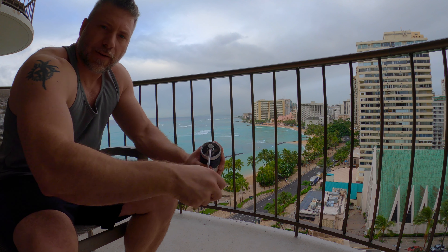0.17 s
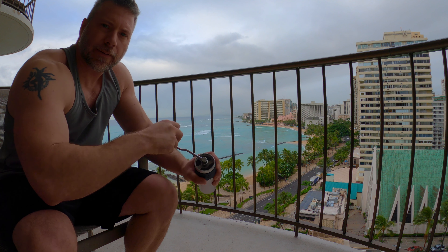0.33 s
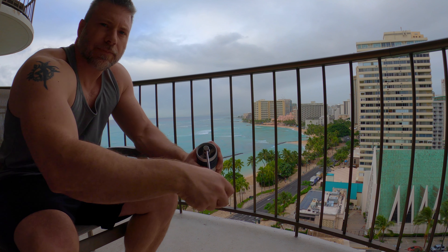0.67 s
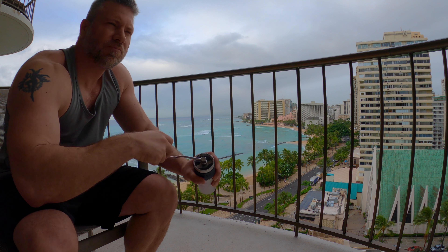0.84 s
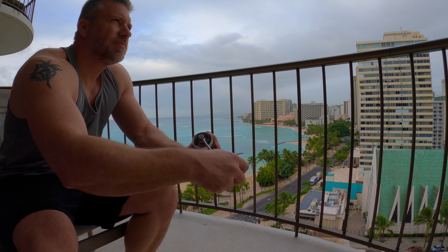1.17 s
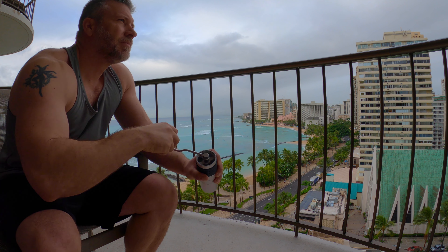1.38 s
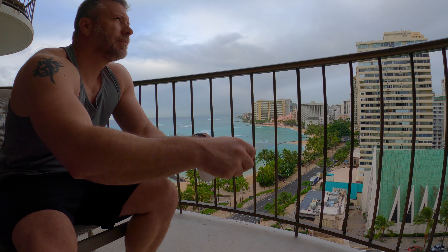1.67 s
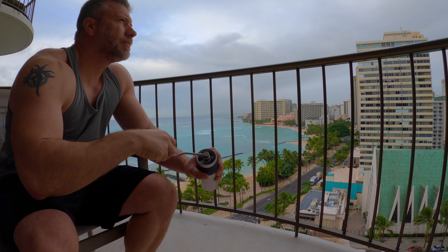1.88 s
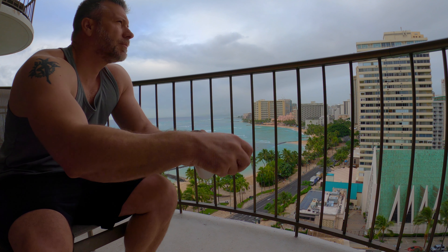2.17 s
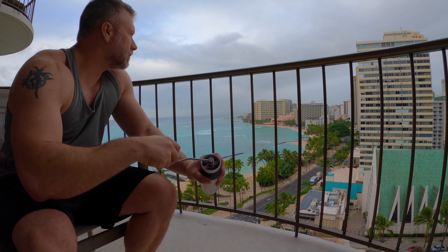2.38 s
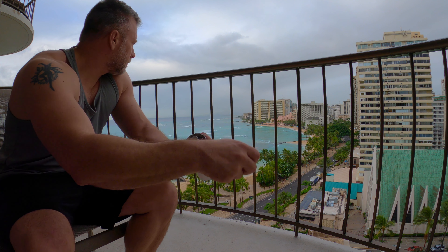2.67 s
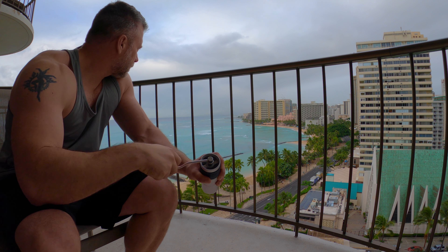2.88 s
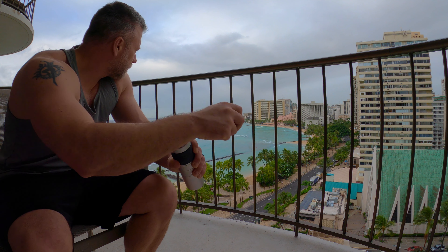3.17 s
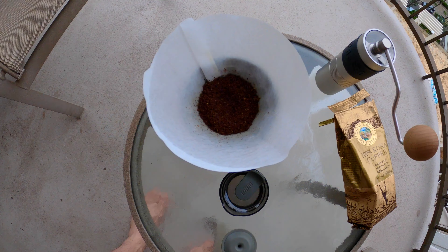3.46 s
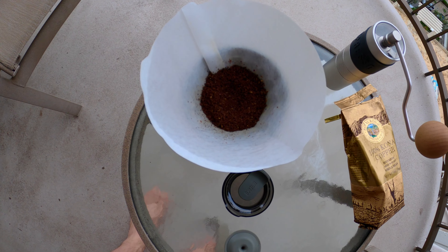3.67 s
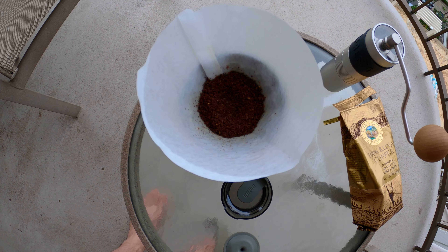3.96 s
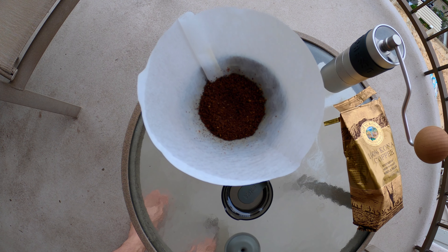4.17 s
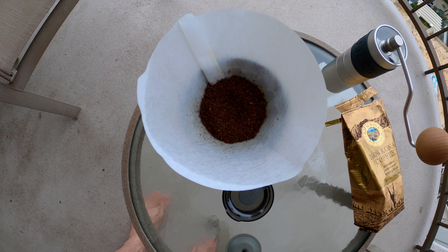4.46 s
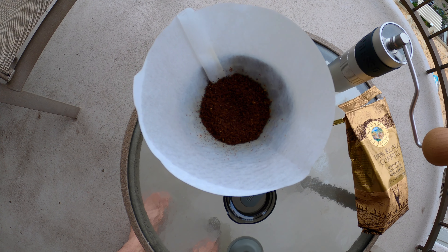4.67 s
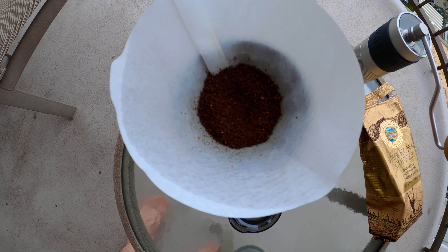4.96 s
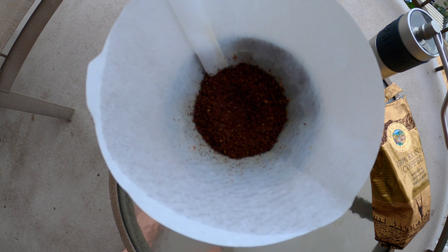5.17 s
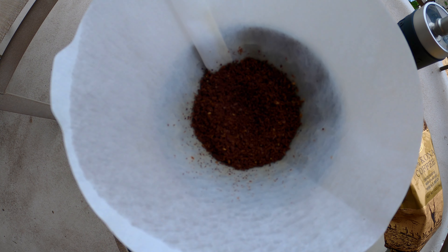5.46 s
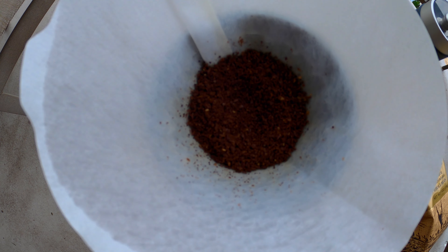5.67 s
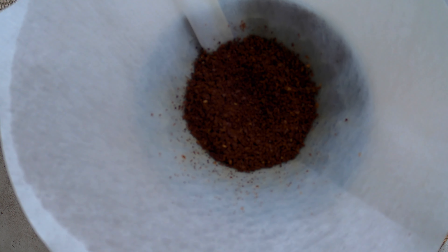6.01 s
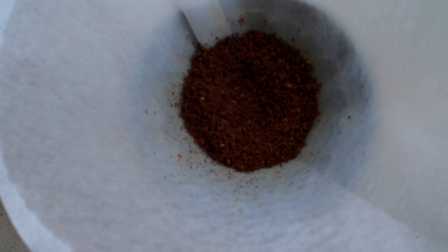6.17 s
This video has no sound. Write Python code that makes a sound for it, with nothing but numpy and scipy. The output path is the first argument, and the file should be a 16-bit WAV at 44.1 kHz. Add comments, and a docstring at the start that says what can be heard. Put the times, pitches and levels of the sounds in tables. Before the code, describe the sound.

On a high balcony, a hand grinder is cranked about twice a second. Coffee beans crunch and snap between its burrs, making the metal shell ring, over steady traffic, wind and humming ventilation fans. A little past halfway the sound drops out briefly and returns without the grinder. Gusts thump the microphone, a heavy vehicle drones away in the street below, and one fan whines faintly.

```python
"""A hand coffee grinder is cranked about twice a second on a high balcony. Beans crack and crumble
between its burrs (the toothed grinding parts), and the cracks make its metal shell ring.
Traffic, wind and the hum of ventilation fans lie behind it. The sound fades out and back in to a
second scene: the grinder rests, gusts buffet the microphone, a heavy vehicle drones away in the
street below and one fan whines."""
import sys
import numpy as np
from scipy import signal
from scipy.fft import rfft, irfft, next_fast_len
from scipy.io import wavfile
from scipy.ndimage import uniform_filter1d

SR = 44100
rng = np.random.default_rng(int(sys.argv[2]) if len(sys.argv) > 2 else 0)


def dump_mix(stems):
    """Bounce the given channels to the path in sys.argv[1] as a 16-bit WAV at rate SR."""
    frames = np.atleast_2d(stems).T  # one column per channel
    limited = np.clip(frames, -1, 1)  # hard clip at full scale
    pcm = np.round(limited * 32767).astype(np.int16)
    wavfile.write(sys.argv[1], SR, pcm)


N = 279594

TIME = np.arange(N) / SR
# tone colour (how strong each frequency is) of fine crumbs breaking: f/Hz, level/dB
CRUMB_COLOUR = [(800, -8), (3000, -4.5), (5000, 2), (7000, 0), (9000, -6), (10800, -9.5), (13000, -12.5),
                (15700, -19.5)]
# tone colour of a bean splitting: f/Hz, level/dB
SPLIT_COLOUR = [(300, -22), (900, -4), (1600, 3), (2700, 5.5), (3750, 4.5), (4900, 3.5), (6200, -6),
                (8500, -19), (15000, -39.5)]


def grinder():
    """The sounds of the grinder, and a faint sniff-like hiss, with a slightly different tone on the left and
    right."""
    # how much louder the left side is than the right: f/Hz, level/dB
    left_over_right = [(500, -0.5), (1200, 3), (3000, 2.5), (5000, 0), (8000, -2), (12000, -4)]
    sound = bean_crunch() * empty_burrs() + bean_snaps() + handle_knock() + rasps()
    return filtered(sound, lambda f: undb(spectrum_db(left_over_right, f) * np.array([[.5], [-.5]])))


def bean_crunch(uneven_db=2.0, jolt_db=3.0):
    """The burrs bite: wedged beans splinter, chunks and crumbs break, the body knocks in the hand."""
    # hard pushes on the crank: t/s, coarse crunch/dB, fine crackle/dB, half length/s
    pushes = [(0.003, -46, -49, 0.022), (0.127, -40.5, -55, 0.035), (0.48, -43.5, -48.5, 0.084),
              (0.645, -42.5, -54, 0.031), (0.818, -45.5, -56, 0.042), (0.975, -40.5, -48.5, 0.04),
              (1.165, -47, -53, 0.046), (1.534, -44, -52.5, 0.15), (1.8, -44.5, -51.5, 0.05),
              (2.09, -44, -48.5, 0.11), (2.56, -44.5, -50, 0.046), (3.054, -40.5, -46, 0.099),
              (3.472, -45, -47.5, 0.056)]
    # wedged beans giving way: t/s, low crunch/dB, splinters/dB, half length/s
    wedged_beans = [(0.135, -35.5, -43, 0.02), (0.348, -39, -41, 0.017), (0.45, -36, -50, 0.019),
                    (0.512, -44, -51, .025), (0.588, -35, -42, 0.014), (0.635, -38, -38, 0.024),
                    (0.98, -45, -46, .02), (1.40, -39, -43, .025), (1.472, -50, -45, 0.018),
                    (1.595, -38, -43, .02), (1.655, -41, -46, 0.014), (1.94, -40, -49, 0.023),
                    (2.01, -46, -47, 0.028), (2.107, -39.5, -41, 0.037), (2.445, -40, -42, 0.03),
                    (2.636, -47, -53, 0.022), (2.913, -39, -48, 0.044), (3.145, -36.5, -55, 0.016),
                    (3.212, -38, -47, 0.016), (3.285, -46, -50, 0.014), (3.445, -37.5, -46, 0.027)]
    # tone colours of wedged beans, breaking chunks and the grinder's body: f/Hz, level/dB
    wedged_colour = [(300, -23.5), (800, -5), (1300, -2.5), (1650, -0.5), (2100, -6.5), (3000, -16.5),
                     (10000, -60)]
    chunk_colour = [(300, -26), (900, -15.5), (1600, -9.5), (2400, 0.5), (4200, -3.5), (5200, -12),
                    (7000, -20), (15000, -46)]
    body_colour = [(60, -26.5), (170, -2.5), (260, -3.5), (345, 2), (420, -10.5), (800, -18), (2000, -31),
                   (10000, -65)]
    coarse_db = swells([(s, db, half_s) for s, db, _, half_s in pushes], rest_db=-48)
    fine_db = swells([(s, db, half_s) for s, _, db, half_s in pushes], rest_db=-56)
    # the resting level here is beans that only rub
    crush_db = swells([(s, db, half_s) for s, db, _, half_s in wedged_beans], rest_db=-48.5)
    splinter_db = swells([(s, db, half_s) for s, _, db, half_s in wedged_beans], rest_db=-np.inf)
    bite = unit(undb(uneven_db * np.tanh(walk(27.97)) + jolt_db * np.tanh(walk(110))))
    wedged = balcony(bite * fractures(900, spread_db=1.5), echo_db=-13.5)
    splinters = balcony(bite * fractures(700, spread_db=5.0), echo_db=-2.5)
    chunks = balcony(bite * fractures(800, spread_db=1.0), echo_db=-3.0)
    crumbs = balcony(bite * fractures(380, spread_db=3.8), echo_db=2.0)
    knocks = bite * fractures(700, spread_db=1.1)
    return (unit(metal_shell(colour(wedged, wedged_colour))) * undb(crush_db - 0.5)
            + unit(metal_shell(colour(splinters, SPLIT_COLOUR))) * undb(splinter_db - 2.0)
            + unit(metal_shell(colour(chunks, chunk_colour))) * undb(coarse_db)
            + unit(metal_shell(colour(crumbs, CRUMB_COLOUR))) * undb(fine_db)
            + unit(colour(knocks, body_colour)) * undb(0.33 * coarse_db - 21.5))


def fractures(per_second, spread_db):
    """Tiny breaks click at random moments, many small and a few large."""
    hits = rng.random(N) < per_second / SR
    sizes = undb(spread_db * np.minimum(rng.exponential(size=N), 3))
    return unit(hits * sizes * rng.choice([-1, 1], N))


def empty_burrs():
    """The volume of the crunch, which drops when the burrs run empty for a moment."""
    # lulls in the crunch: t/s, level change/dB, half length/s
    lulls = [(0.235, -4, 0.04), (0.735, -17, .022), (0.92, -4, 0.013), (1.223, -3, 0.017), (2.32, -4, .04),
             (2.8, -2, 0.04)]
    return undb(sum(db * bell_in_time(s, half_s) for s, db, half_s in lulls))


def bean_snaps(crumble_s=0.022, spurt_db=6.0, ping_decay_cycles=5.0):
    """A whole bean splits in a burst of tiny cracks and pings the burr; its pieces crumble in spurts."""
    # snapping beans: t/s, strength/dB, thud boost/dB, time to split/s, ping/Hz, ping/dB, crumbling/dB
    snapping_beans = [(0.087, -39.5, 11, .001, 3970, -27, -19), (0.132, -33.5, 9, .0018, 3430, -29, -13),
                      (0.1613, -29, -10, .0009, 9700, -40, -17), (0.167, -25, -12, .0008, 8000, -44, -16),
                      (0.3122, -34, 0, .001, 9500, -39, -13), (0.326, -31, 6.5, .0016, 3920, -41, -4),
                      (0.402, -31, 4, .0008, 4470, -36, -16), (0.575, -22.5, 4.5, .0009, 3920, -21, -13.5),
                      (0.606, -37, 6, .0008, 2840, -31, -17.5), (0.6205, -31, 8, .0016, 2300, -32.5, -14),
                      (0.6243, -25, 9.5, .0013, 3740, -17.5, -12), (0.646, -39, 10, .001, 3900, -32, -16),
                      (0.662, -37.5, 10, .0014, 4300, -33, -20.5), (0.7755, -23, -2, .0025, 6100, -42, -13),
                      (0.8884, -30, 2, .001, 4100, -38, -16), (0.99, -24.5, -5, .001, 4100, -41, -20),
                      (1.093, -29, -1, .0009, 3080, -33, -16), (1.1149, -33, -1, .0007, 4040, -36, -18),
                      (1.1606, -30, 6.5, .0013, 3180, -40, -18), (1.358, -38, 4, .001, 8200, -31, -16.5),
                      (1.4501, -40, 8, .0008, 3010, -28, -19), (1.466, -38, 10.5, .0009, 3140, -23.5, -18),
                      (1.4855, -38, 8, .001, 3200, -33, -20), (1.5396, -28, 2.5, .001, 4030, -36, -20),
                      (1.623, -24.5, -1, .0009, 4060, -26, -15), (1.746, -34.5, 8.5, .0012, 2860, -33, -18),
                      (1.8133, -37, 4, .001, 4100, -40, -18), (1.9265, -38, 9.5, .001, 3000, -38, -15),
                      (2.044, -23, 0, .0014, 4300, -29, -12), (2.0792, -31, 2, .001, 4100, -40, -16),
                      (2.146, -34, 1, .0009, 2900, -31, -20), (2.193, -23, -5, .0008, 3100, -38, -8),
                      (2.382, -33, 3, .001, 8200, -35, -16), (2.4116, -35, 10, .0015, 2960, -36, -16),
                      (2.537, -37, 2, .0014, 4200, -40, -14), (2.8804, -46, 7, .001, 3000, -35, -16),
                      (2.9588, -22.5, -4, .0015, 2720, -36, -16), (3.036, -29, -8, .0009, 9400, -39, -16),
                      (3.043, -25.5, -4, .0012, 2870, -39, -16), (3.0649, -29, -1, .001, 3070, -37, -16),
                      (3.0848, -27, -11, .001, 8700, -42, -16), (3.1388, -39, 1, .0014, 3970, -37, -16),
                      (3.4171, -30, 4, .001, 4200, -38, -16), (3.4987, -32, 5, .001, 4600, -31, -13)]
    t = TIME[:SR // 12]
    ticks, thuds, pings = np.zeros((3, N))
    spurts = unit(undb(spurt_db * np.tanh(walk(400))))
    for s, db, thud_db, split_s, ping_hz, ping_db, crumble_db in snapping_beans:
        start = int((s + .0007) * SR)
        span = slice(start, start + len(t))
        cracks = rng.standard_normal(len(t))
        split = cracks * t / split_s * np.exp(1 - t / split_s)
        crumble = cracks * spurts[span] * np.exp(-t / crumble_s) * (t > split_s)
        size = 4 * undb(db) / np.sqrt(np.sum(split ** 2))
        ticks[span] += size * undb(-3) * split
        thuds[span] += size * undb(thud_db - 1.5) * (split + undb(crumble_db) * crumble)
        cycles = np.maximum(t - split_s, 0) * ping_hz
        pings[span] += undb(ping_db) * np.sin(2 * np.pi * cycles) * np.exp(-cycles / ping_decay_cycles)
    sharp = colour(balcony(ticks, echo_db=-11), CRUMB_COLOUR)
    dull = colour(balcony(thuds, echo_db=-3.5), SPLIT_COLOUR)
    return pings + metal_shell(sharp + dull)


def metal_shell(cracks, swing_db=6.5):
    """Cracks ring the metal; two sets of tones come and go as the beans press on the burrs."""
    # ringing tones of the shell and crank: f/Hz, width/Hz, level against the bare crack/dB
    shell_tones = [(1835, 55, 0), (2360, 120, 0), (3090, 200, -3), (3920, 105, -1), (4220, 120, 0),
                   (6300, 230, -0.5), (7880, 160, -7), (8430, 140, 3), (8670, 170, 7.5), (9530, 630, 0),
                   (12070, 420, 0.5)]
    out = cracks
    for tones in shell_tones[0::2], shell_tones[1::2]:
        ring = signal.oaconvolve(cracks, ringing(tones)[None], axes=1)[:, :N]
        out = out + ring * undb(swing_db * np.tanh(walk(18)))
    return out


def handle_knock(at_s=0.8528, level_db=-22, rattle_s=0.03, rattle_db=-20):
    """The crank handle knocks once on its shaft and rattles briefly."""
    # ringing tones of the handle: f/Hz, width/Hz, level/dB
    handle_tones = [(2020, 240, -7), (3050, 220, -5), (4150, 280, -0.5), (5550, 260, -6), (7940, 340, 0),
                    (8600, 650, -2.5), (12000, 500, -14)]
    t = TIME[:SR // 20]
    knock = sum(undb(db) * np.sin(2 * np.pi * hz * t) * np.exp(-np.pi * width * t)
                for hz, width, db in handle_tones)
    shaking = rng.standard_normal((2, len(t)))
    ring = unit(signal.fftconvolve(shaking, ringing(handle_tones)[None], axes=1)[:, :len(t)])
    rattle = undb(rattle_db) * ring * np.exp(-t / rattle_s)
    start, out = int(at_s * SR), np.zeros((2, N))
    out[:, start:start + len(t)] = undb(level_db) * (knock + rattle)
    return out


def rasps(width_share=0.068, bend_s=0.00008):
    """A brief, soft, whistling hiss near 5.7 kHz, like a sniff; later the burrs graze each other, sticking and
    slipping: a rasp, and a tone that sings in fits."""
    # rasps: t/s, half length/s, ring/Hz, ring/dB, rasp/dB; the first is a soft hiss like a sniff, the rest are
    # scrapes of the burrs
    rasp_rows = [(1.352, 0.049, 5670, -50, -39.5), (2.62, 0.06, 8750, -62, -63), (3.0, .03, 1800, -47, -62),
                 (3.25, 0.12, 4170, -53, -54), (3.296, .16, 8770, -61, -67)]
    # tone colour of the rasp: f/Hz, level/dB
    rasp_colour = [(1200, -19), (2600, -3), (3500, 1), (4100, 1), (4700, 0), (5700, -3), (6600, -4),
                   (7500, -15), (9000, -15), (15000, -42)]
    slips = balcony(fractures(2500, spread_db=4.0), echo_db=-6) * undb(0.5 * walk(60))
    rasp = unit(colour(slips, rasp_colour))
    fits = unit(undb(np.tanh(walk(45))))
    bent_samples = (TIME + bend_s * walk(25)) * SR  # the changing load bends the pitch
    out = 0
    for s, half_s, hz, ring_db, rasp_db in rasp_rows:
        peak = signal.iirpeak(hz, 1 / width_share, fs=SR)
        ring = signal.lfilter(*peak, signal.lfilter(*peak, slips))
        ring = fits * unit(np.array([np.interp(bent_samples, np.arange(N), side) for side in ring]))
        out = out + (undb(ring_db) * ring + undb(rasp_db) * rasp) * np.sqrt(bell_in_time(s, half_s))
    return out


def balcony(clicks, echo_db, near_s=0.0097, far_s=0.0074):
    """Clicks reach the right side slightly early; hands, floor and wall scatter each one differently."""
    t = TIME[:SR // 8]
    decay = np.exp(-t / near_s) / near_s + 0.33 * np.exp(-t / far_s) / far_s
    energy = signal.fftconvolve(clicks ** 2, decay / decay.sum())[:N]
    scattered = np.sqrt(np.abs(energy)) * rng.standard_normal((2, N))
    direct = filtered(clicks, lambda f: np.exp(1j * 0.31 * np.tanh(f / 1800) * np.array([[-.5], [.5]])))
    return direct + undb(echo_db) * scattered


def wind(buffet_db=4.5):
    """Gusts buffet the microphone with low, uneven thumps."""
    # gusts: t/s, level/dB, half length/s
    gust_times = [(3.76, -33, .04), (3.855, -28.5, 0.047), (3.97, -28, 0.028), (4.21, -31, 0.04),
                  (4.34, -34, .06)]
    # tone colour of the thumps: f/Hz, level/dB
    thump_colour = [(15, -11.5), (40, -6), (90, -0.5), (170, -3), (260, -10), (600, -27), (3000, -64),
                    (15000, -120)]
    swirls = colour(rng.standard_normal(N), thump_colour) * undb(buffet_db * walk(45))
    return unit(swirls) * undb(swells(gust_times, rest_db=-48))


def heavy_vehicle():
    """A heavy vehicle drones and fades unevenly as it drives away."""
    # tones of the drone: f/Hz, width/Hz, level/dB
    drone_tones = [(30, 33, -10.5), (49, 11, -9), (86.7, 27, -3), (103, 12, -3.5), (157, 45, -4),
                   (207.6, 30, -2), (303.3, 30, -8), (470, 61, -20.5), (591, 46, -6.5), (744, 19, -16),
                   (1176, 23, -19)]
    # loudness of the drone: t/s, level/dB
    drone_levels = [(3.7, -28), (3.87, -30), (4.08, -35.5), (4.33, -32.5), (4.6, -42), (5.4, -36.5),
                    (6.3, -55)]
    drone = unit(sum(undb(db) * hum(hz, width) for hz, width, db in drone_tones))
    return drone * undb(curves(drone_levels)[0])


def settling_street(nearest_s=4.11, rumble_settle_s=0.4, rush_settle_s=1.15, split_hz=1100):
    """Low rumble and the rush of tyres sink back into the town once the vehicle has passed."""
    # tone colour of the town in the second scene: f/Hz, level/dB
    town_colour = [(12, -23), (28, -9), (65, -19.5), (110, -11), (215, -10.5), (370, -16.5), (620, -18),
                   (1100, -20), (1600, -24.5), (3600, -33), (7000, -50), (9000, -52.5), (11000, -69),
                   (14000, -90)]
    since_nearest = np.maximum(TIME - nearest_s, 0)
    rumble_db = -33.3 + 5 * np.exp(-since_nearest / rumble_settle_s)
    rush_db = -43.5 + 9 * np.exp(-since_nearest / rush_settle_s)
    rush_db += 2.6 * bell_in_time(at_s=5.27, half_s=0.1)  # a brief swell of hiss
    air = town(town_colour, swell_db=0.4, flicker_db=0.2)
    rumble = filtered(air, lambda f: 1 / (1 + (f / split_hz) ** 2))
    return rumble * undb(rumble_db) + (air - rumble) * undb(rush_db)


def steady_street(town_db=-31.0, side_db=-47.5):
    """The town behind the grinder; a small part of its noise differs between left and right."""
    # tone colours of the town and of that small part: f/Hz, level/dB
    town_colour = [(12, -13.5), (28, -8), (68, -3), (110, 0), (140, -1), (220, -1.5), (420, -9),
                   (1050, -13.5), (1500, -16.5), (3000, -23.5), (5000, -34.5), (9000, -44), (11000, -57),
                   (15000, -62)]
    side_colour = [(25, 1.5), (70, -1.5), (140, -14.5), (300, 5.0), (1100, 6.5), (2500, 3.0),
                   (9000, -13.5), (15000, -38.5)]
    side = unit(colour(rng.standard_normal(N), side_colour)) * np.array([[1], [-1]])
    return undb(town_db) * town(town_colour, swell_db=1.0, flicker_db=0.95) + undb(side_db) * side


def town(points, swell_db, flicker_db):
    """Traffic and wind: bands of noise, an octave apart, swell together and flicker on their own."""
    noise = colour(rng.standard_normal(N), points)
    swell, out = walk(2.26), 0
    for octave in range(4, 15):
        band = filtered(noise, lambda f: np.maximum(1 - abs(np.log2(f) - octave), 0))
        out = out + band * undb(swell_db * swell + flicker_db * walk(15))
    return unit(out)


def fan_whine(waver_hz=2.34, flutter_db=2.0):
    """One fan's blades whine, wavering in the wind and clearer once the vehicle is gone."""
    # course of the whine: t/s, f/Hz, level/dB
    whine_course = [(4.4, 1062, -66), (4.63, 1072, -57), (4.7, 1070, -47.5), (5.18, 1067, -48.5),
                    (5.26, 1069, -54), (5.34, 1074, -51), (5.65, 1071, -47), (5.85, 1071, -49),
                    (6.1, 1068, -45), (6.33, 1060, -45)]
    hz, db = curves(whine_course)
    phase = 2 * np.pi * np.cumsum(hz + waver_hz * walk(25)) / SR
    return unit(np.sin(phase) * undb(flutter_db * walk(25))) * undb(db)


def fan_hum():
    """Ventilation fans hum; returns one mix of their tones for each scene."""
    # fan tones: f/Hz, width/Hz, level in the first scene/dB, level in the second/dB
    fan_tones = [(49.7, 7.9, -35.5, -38.5), (84.4, 6.7, -47, -39), (109.4, 18, -40, -46.5),
                 (300.5, 17.8, -44.5, -49), (465, 39, -50, -49.5), (1050, 68, -46, -68)]
    first = second = 0
    for hz, width, first_db, second_db in fan_tones:
        tone = hum(hz, width)
        first = first + undb(first_db) * tone
        second = second + undb(second_db) * tone
    return first, second


def hum(hz, width):
    """An unsteady tone: noise filtered twice down to a narrow band around one pitch."""
    return unit(filtered(rng.standard_normal(N), lambda f: resonance(f, hz, 1.01 * width) ** 2))


def resonance(f, hz, width):
    """A filter that lets hz through fully and weakens the frequencies around it."""
    return 1 / (1 + 1j * (f / hz - hz / f) * hz / width)


def ringing(tones):
    """The ring after one click, from rows of f/Hz, width/Hz, level/dB; wider tones die sooner."""
    t = TIME[:SR // 20]
    ring = sum(undb(db) * 2 * np.pi * width / SR * np.cos(2 * np.pi * hz * t)
               * np.exp(-np.pi * width * t) for hz, width, db in tones)
    return ring * np.where(t > 0, 1, .5)


def colour(x, points):
    """Give x a tone colour; nothing sounds ahead of a click, so it keeps its sharp start."""
    def response(f):
        cepstrum = irfft(np.log(undb(spectrum_db(points, f))))
        cepstrum[1:len(f) - 1] *= 2  # move the part before the click to after it
        cepstrum[len(f):] = 0
        return np.exp(rfft(cepstrum))
    return filtered(x, response)


def filtered(x, response):
    """Multiply each frequency f in x by response(f)."""
    size = next_fast_len(N + SR // 4, True)
    size += size % 2
    return irfft(rfft(x, size) * response(np.maximum(np.fft.rfftfreq(size, 1 / SR), 1)), size)[..., :N]


def spectrum_db(points, hz):
    """The level at hz, read between points of f/Hz, level/dB with octaves evenly spaced."""
    f, db = np.transpose(points)
    return np.interp(np.log(hz), np.log(f), db)


def walk(per_second):
    """A smooth random curve of typical size 1 that heads for new values at the given rate."""
    hold = int(SR / per_second)
    steps = np.repeat(rng.standard_normal(N // hold + 1), hold)
    return unit(uniform_filter1d(uniform_filter1d(steps, hold), hold)[:N])


def swells(table, rest_db):
    """Level in dB of swells (t/s, level/dB, half length/s) over a steady resting level."""
    power = sum(undb(db) ** 2 * bell_in_time(s, half_s) for s, db, half_s in table)
    return 10 * np.log10(power + undb(rest_db) ** 2)


def bell_in_time(at_s, half_s):
    """A bell-shaped rise to 1 and back."""
    return np.exp(-((TIME - at_s) / half_s) ** 2)


def curves(table):
    """Each column after the first (t/s) as a line through time."""
    s, *columns = np.transpose(table)
    return [np.interp(TIME, s, c) for c in columns]


def undb(db):
    """Turn decibels into a volume factor."""
    return 10 ** (np.asarray(db) / 20)


def unit(x):
    """Scale to an average strength (rms) of 1."""
    return x / np.sqrt(np.mean(x ** 2))


def scene():
    """The grinding, a short fade, then the balcony with the grinder at rest; fans run through both."""
    # fades of the first and the second scene: t/s, level/dB
    first_fade = [(3.508, -2.5), (3.522, -39.5), (3.56, -79), (3.66, -66), (3.7, -120)]
    second_fade = [(3.5, -89.5), (3.58, -73), (3.65, -62), (3.672, -18), (3.688, -10.5), (3.73, -1)]
    grinding = grinder() + steady_street()
    resting = settling_street() + heavy_vehicle() + wind() + fan_whine()
    first_fans, second_fans = fan_hum()
    return ((grinding + first_fans) * undb(curves(first_fade)[0])
            + (resting + second_fans) * undb(curves(second_fade)[0]))


def record(dry):
    """Cut off the highest treble, above 15600 Hz."""
    return signal.sosfilt(signal.ellip(10, .1, 80, 15600, fs=SR, output="sos"), dry)


dry = scene()
out = record(dry)
dump_mix(out)
```